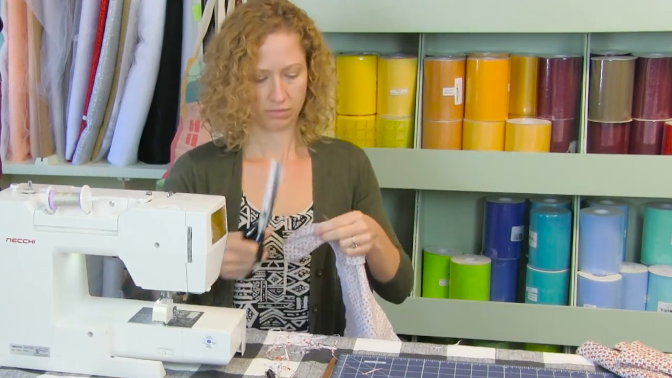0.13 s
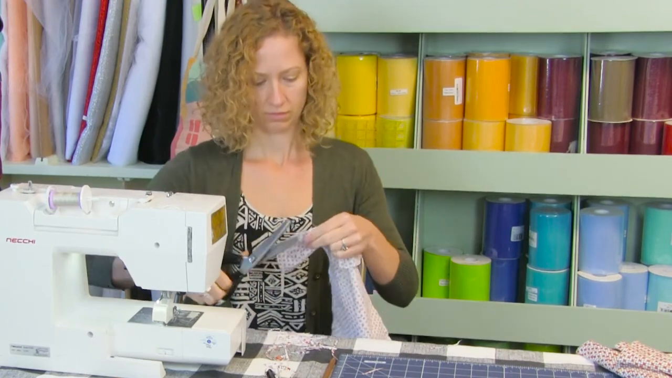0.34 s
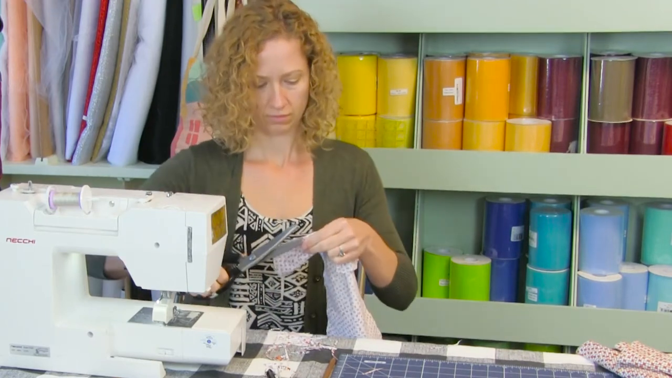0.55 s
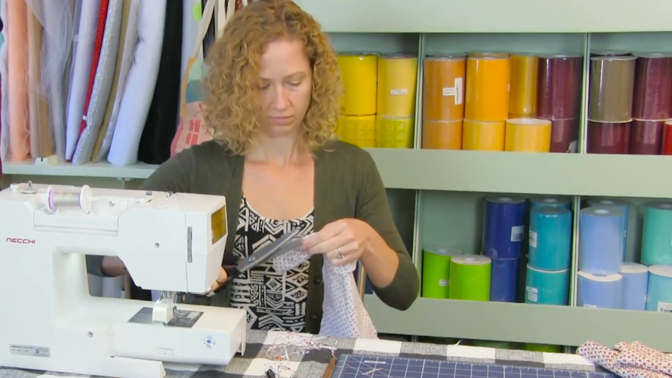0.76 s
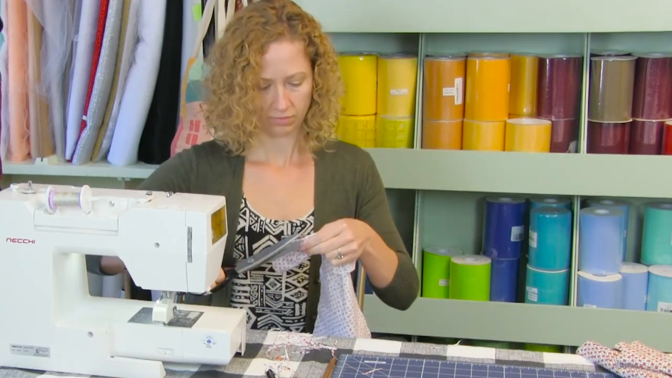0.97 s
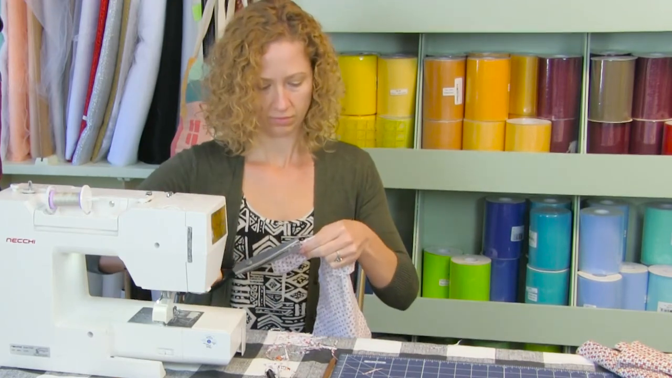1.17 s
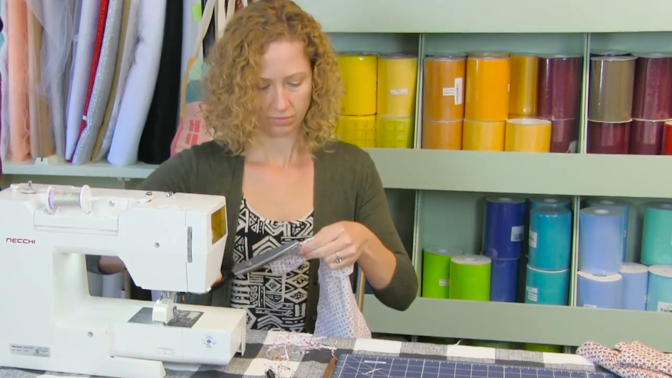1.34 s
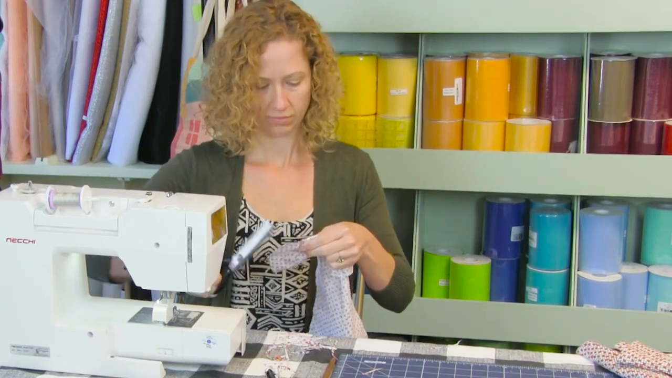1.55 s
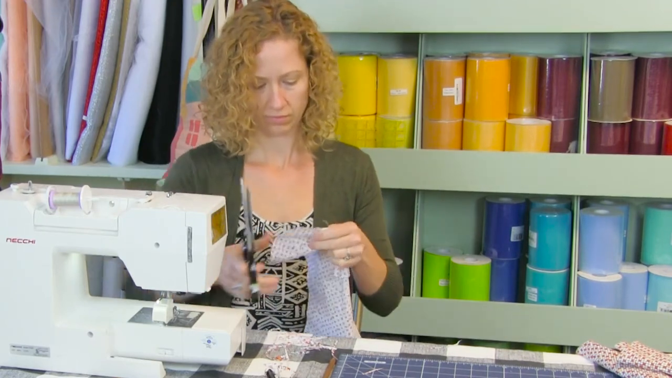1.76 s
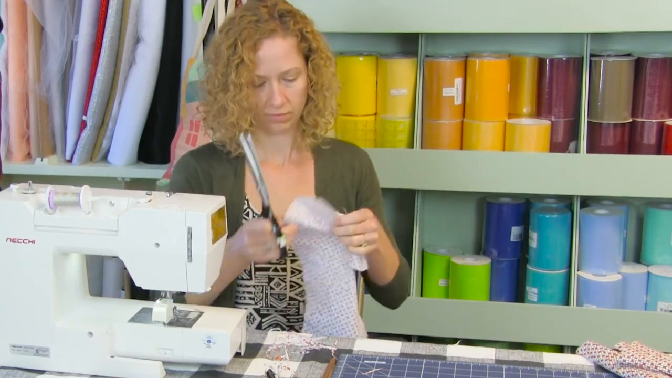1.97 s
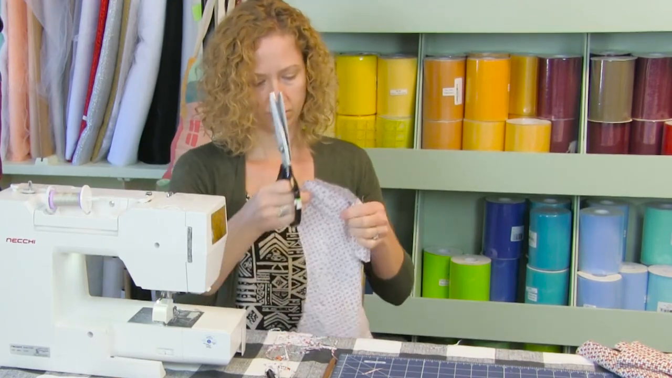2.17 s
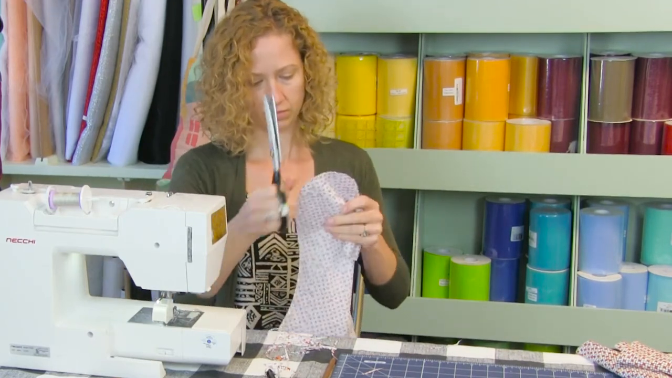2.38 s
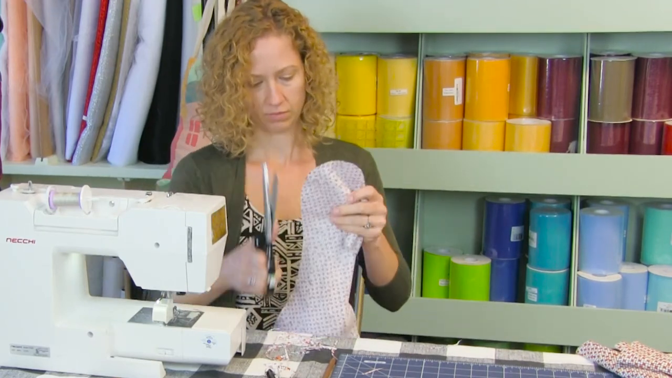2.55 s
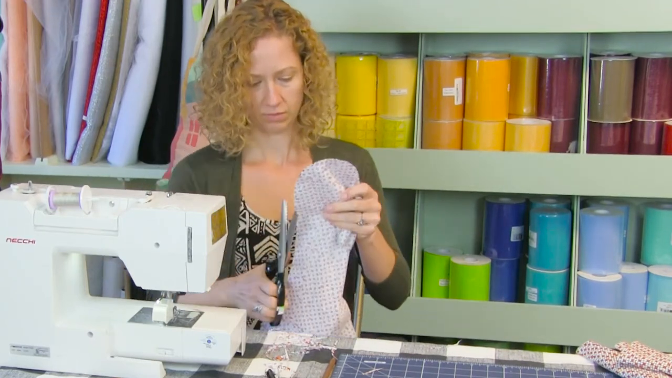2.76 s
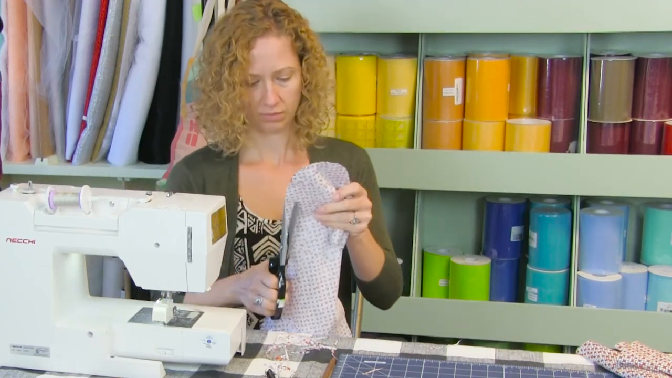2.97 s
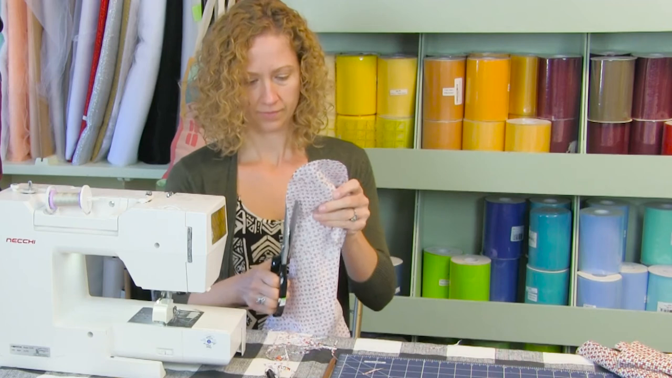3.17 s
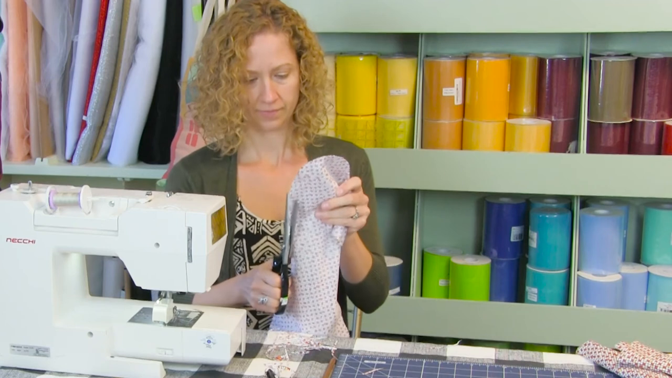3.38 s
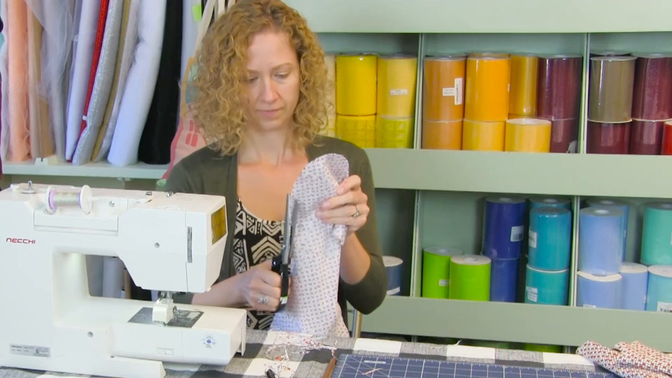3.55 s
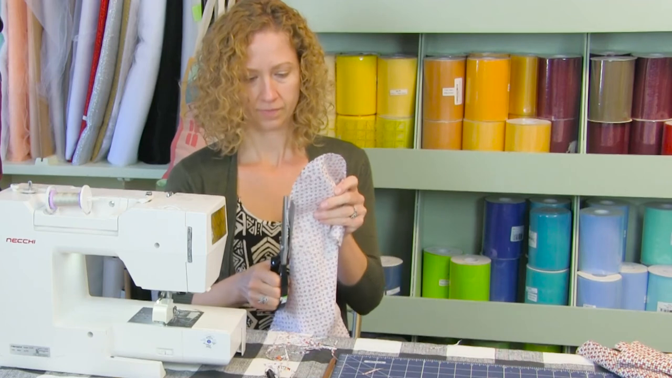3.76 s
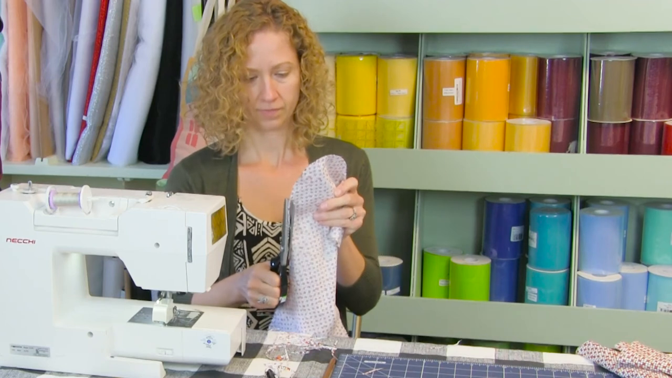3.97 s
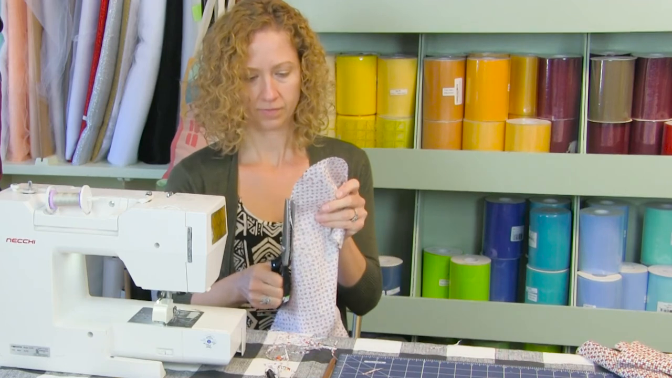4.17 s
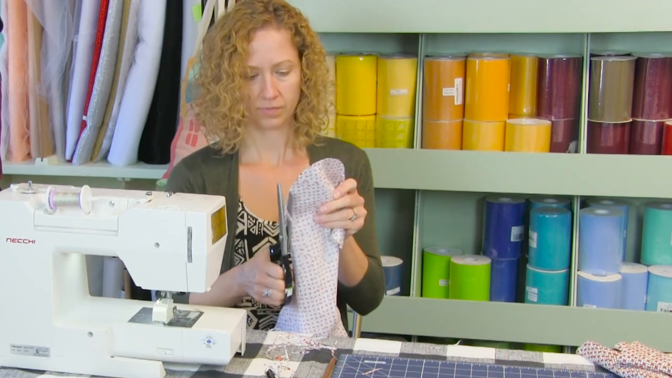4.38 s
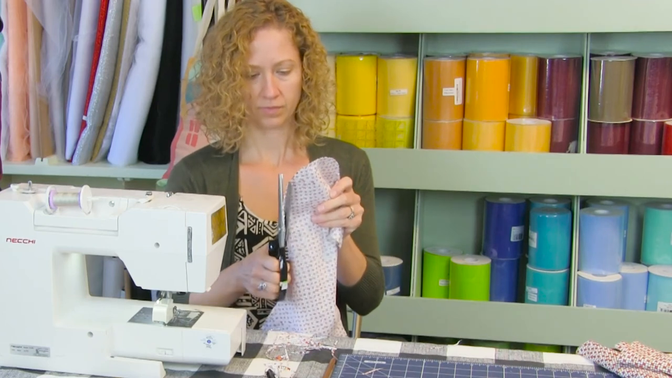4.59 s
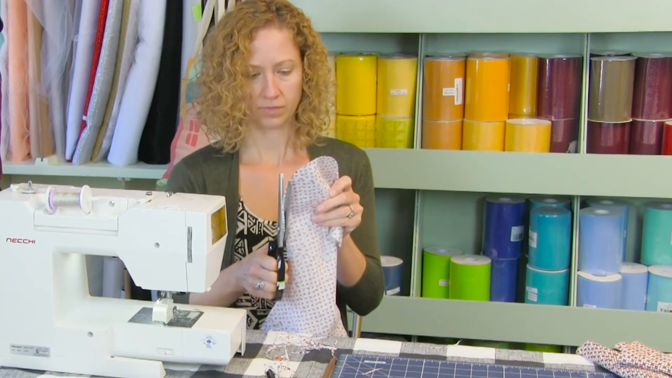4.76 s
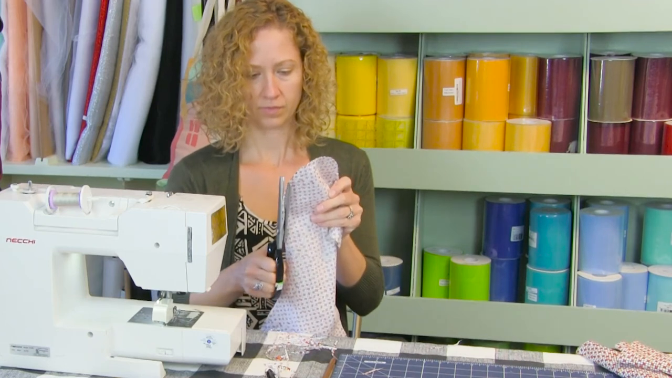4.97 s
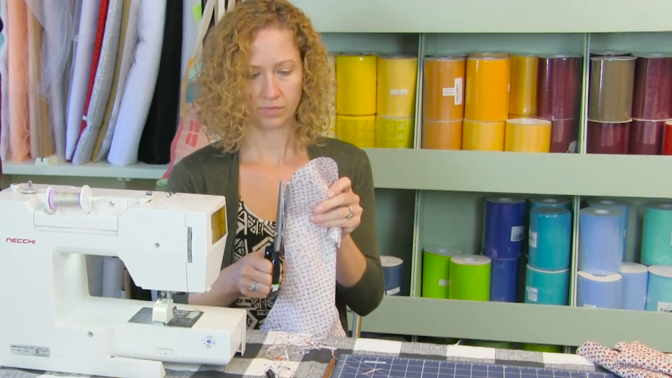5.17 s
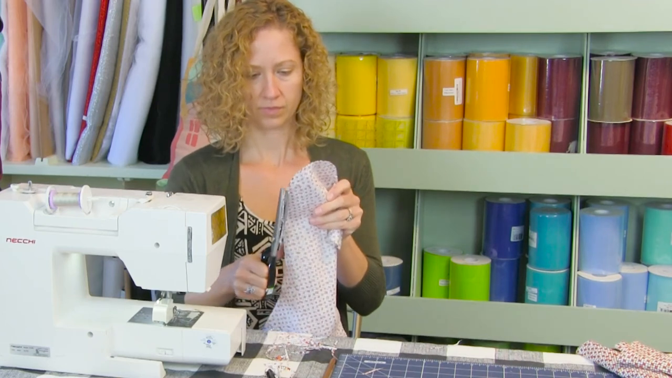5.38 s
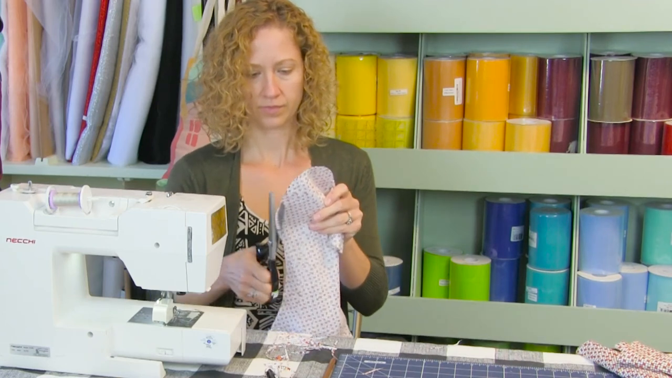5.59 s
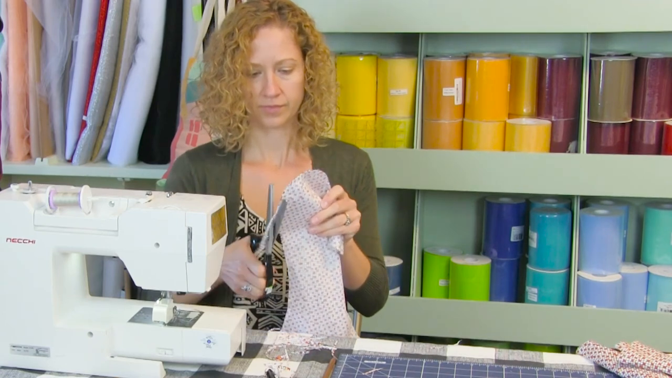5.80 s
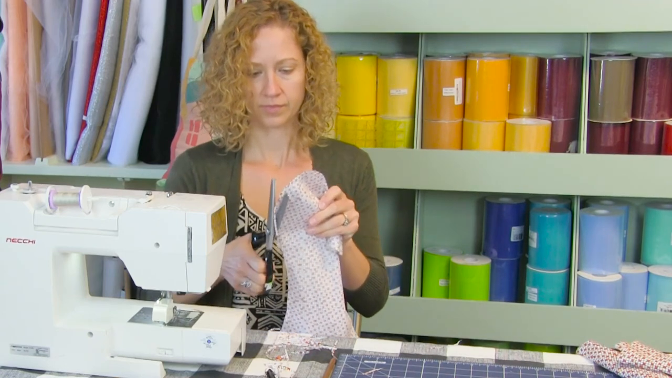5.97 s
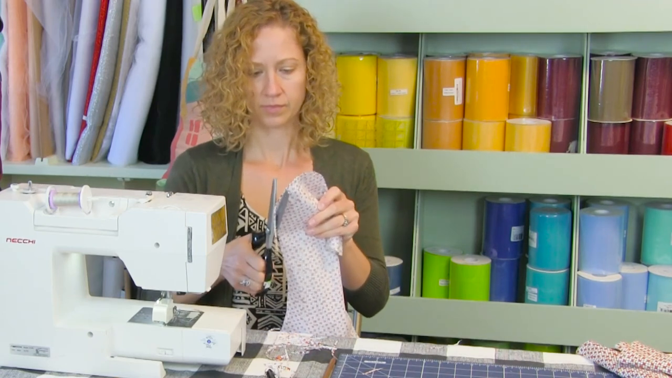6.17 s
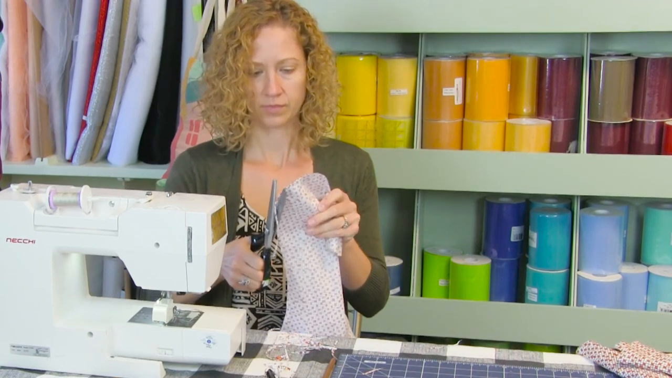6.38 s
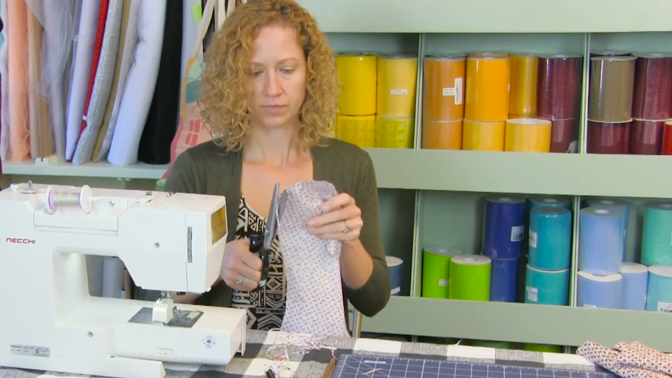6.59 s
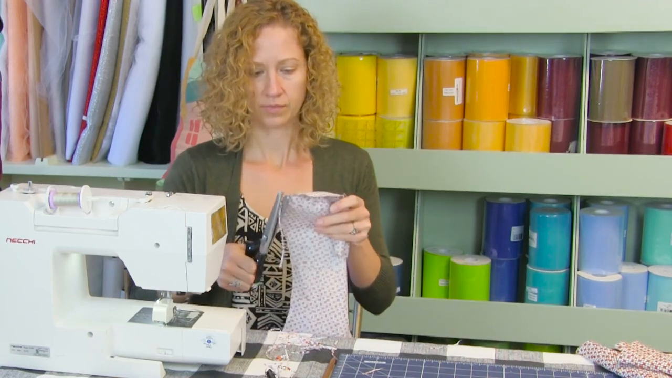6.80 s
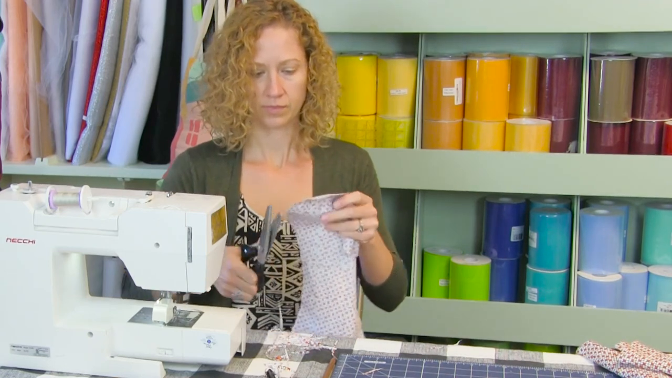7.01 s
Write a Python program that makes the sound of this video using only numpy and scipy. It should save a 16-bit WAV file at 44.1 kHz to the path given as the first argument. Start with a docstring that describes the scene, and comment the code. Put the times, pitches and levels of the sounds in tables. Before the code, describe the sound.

Close fabric cutting: a short snip snapping shut with a sharp metallic click, then three slower crunching cuts, light blade scrapes and cloth rustle between.

```python
"""At a sewing table in a small, dry room, shears make four slow snips into a cloth seam, heard in stereo.
Thread bundles and single threads part as bursts of grainy noise, coloured by where the blades cross.
The first snip ends in a slam, a chirped blow on blade modes; reopening blades scrape and tap as noise.
Flickering noise is cloth in the hand; tinted noise and hum lines rumble quietly underneath."""
import sys
import numpy as np
from scipy import signal
from scipy.fft import rfft, irfft
from scipy.io import wavfile

SR = 44100
rng = np.random.default_rng(int(sys.argv[2]) if len(sys.argv) > 2 else 0)


def store_pcm(level_fs):
    """Save levels as 16-bit WAV."""
    pcm = np.round(np.clip(level_fs, -1, 1) * 32767).astype(np.int16)
    wavfile.write(sys.argv[1], SR, np.atleast_2d(pcm).T)


N = 310464
SIZE = 4096  # samples per short sound
TIME_S = np.arange(N) / SR
AGE_S = np.arange(SIZE) / SR
BINS_HZ = np.fft.rfftfreq(SIZE, 1 / SR)

# strokes of the shears; the edges' crossing point travels from pivot (0) to tips (1):
# (start [s], end [s], travel at start [0-1], travel at end [0-1], relative single-thread level [dB],
#  body lift [dB], left minus right [dB])
SNIPS = [(0.938, 1.35, 0.69, 0.88, -67.5, -6.5, 1), (3.299, 4.15, 0, 0.85, -65, 4.5, 0),
         (4.85, 5.441, 0.018, 0.88, -60, 0, -1), (6.27, 6.93, 0.02, 0.79, -58.5, 0.5, -1)]


def undb(db):
    """Decibels to gain."""
    return 10 ** (np.asarray(db) / 20)


def unit(x):
    """Scale to rms 1."""
    return x / np.sqrt(np.mean(x ** 2))


def colour(points, hz=BINS_HZ):
    """Interpolate (Hz, dB) points on a log-frequency axis."""
    point_hz, point_db = np.transpose(points)
    return np.interp(np.log(hz + 1), np.log(point_hz), point_db)


def shelves(body_db, edge_db):
    """Lift the body below 4.5 kHz and the edge above 9 kHz, in dB."""
    return colour([(1500, body_db), (4500, 0), (9000, 0), (13500, edge_db)])


def bell(centre_hz, width_hz):
    """Shape of a resonance, 1 at its centre."""
    return 1 / (1 + (2 * (BINS_HZ - centre_hz) / width_hz) ** 2)


def resonate(push, db):
    """Ring a short push through a causal, minimum-phase filter of unit mean power."""
    cepstrum = irfft(np.log(unit(undb(db))))
    # fold onto positive time: minimum phase
    cepstrum[1:SIZE // 2] *= 2
    cepstrum[SIZE // 2 + 1:] = 0
    response = np.exp(rfft(cepstrum))
    return irfft(rfft(push) * response)


def noise(size, shared):
    """Two noises of rms 1 with a share of power in common."""
    common, *own = rng.standard_normal((3, size))
    return np.sqrt(shared) * common + np.sqrt(1 - shared) * np.array(own)


def tinted(points, size, shared):
    """Steady stereo noise of the given colour, rms 1."""
    gain = undb(colour(points, np.fft.rfftfreq(size, 1 / SR)))
    return unit(irfft(rfft(noise(size, shared)) * gain, size))


def grains(grit_db, shared):
    """Dense micro-fractures: noise whose strength jumps every 8 samples, rms 1."""
    strength = np.repeat(rng.exponential(size=SIZE // 8), 8).clip(0, 4)
    return unit(noise(SIZE, shared) * undb(grit_db * strength))


def pan(left_minus_right_db):
    """Left and right gains for a level difference."""
    return undb(np.array([[left_minus_right_db], [-left_minus_right_db]]) / 2)


def add(out, s, sound):
    """Mix a short sound in at time s."""
    i = max(int(s * SR), 0)
    out[:, i:i + SIZE] += sound[:, :max(N - i, 0)]


def background(air_db=-60.5, waver_rad=.8, hum_pan_db=-3):
    """Ventilation noise whose bottom slowly swells, with a smooth hiss and phase-wandering hum lines."""
    # spectrum of the air: (frequency [Hz], relative density [dB per Hz])
    air_colour = [(15, -13.5), (28, -9.5), (42, 0), (58, -7.5), (80, -3), (125, -13.5), (170, -25),
                  (230, -21), (320, -32), (500, -34), (700, -39), (1500, -43), (3500, -48.5),
                  (10500, -49.5), (15500, -70)]
    # channel balance of the air: (frequency [Hz], left minus right [dB])
    air_balance = [(30, -6), (80, -3.5), (160, -3.5), (350, 0), (700, 0.5), (15000, -0.5)]
    # swell of the rumble below about 60 Hz: (time [s], lift [dB])
    rumble_swell = [(0, 0), (.9, 5.5), (1.4, -2), (4.3, -2), (5.2, 3), (6.4, 2), (7.04, 8)]
    # hum lines: (frequency [Hz], rms level before panning [dB])
    hum_lines = [(41, -67), (79, -69), (120, -74.5), (237, -82), (297, -88), (360, -90)]

    hz = np.fft.rfftfreq(N, 1 / SR)
    side_db = np.outer([.5, -.5], colour(air_balance, hz))
    air = rfft(tinted(air_colour, N, shared=0.091)) * undb(air_db + side_db)
    low = irfft(air / (1 + (hz / 60) ** 4), N)
    swell = undb(np.interp(TIME_S, *np.transpose(rumble_swell)))
    out = irfft(air, N) + low * (swell - 1)

    knots_s = np.linspace(0, N / SR, num=36)
    for line_hz, db in hum_lines:
        steps = noise(len(knots_s), shared=.5)
        drift = np.array([np.interp(TIME_S, knots_s, np.cumsum(side)) for side in steps])
        tone = np.sin(2 * np.pi * line_hz * TIME_S + waver_rad * drift)
        out += np.sqrt(2) * undb(db) * pan(hum_pan_db) * tone
    return out


def room(direct, scattered, table_s=0.0031, table_db=-19, early_db=-7.5, early_t60_s=0.13,
         late_db=-21, late_t60_s=0.15, mic_lag_s=.002):
    """A table bounce, then a short tail soaked up by fabric; the right microphone is further off."""
    # colour of the tail: (frequency [Hz], relative level [dB])
    tail_colour = [(150, -3), (700, -1), (2200, 3), (5000, 0), (8000, -3.5), (10000, 3), (15500, -7.5)]

    age_s = np.arange(4 * SIZE) / SR
    onset = np.clip(age_s / table_s - .5, 0, 1)
    fade = 0
    for db, t60_s in ((early_db, early_t60_s), (late_db, late_t60_s)):
        fade = fade + undb(db) * unit(np.exp(-np.log(1000) * age_s / t60_s) * onset)
    response = tinted(tail_colour, len(age_s), shared=0) * fade / np.sqrt(len(age_s))
    tail = signal.fftconvolve(scattered, response, axes=1)[:, :N]
    bounce = undb(table_db) * np.roll(direct, int(table_s * SR), axis=1)
    left, right = direct + bounce + tail
    return np.array([left, np.roll(right, int(mic_lag_s * SR))])


def handling(flutter_db=3.5, held_db=-92):
    """Cloth slides through the fingers as flickering noise brushes, with soft bumps of the hands."""
    # cloth turned in the hand: (time [s], relative level [dB], Gaussian half length [s])
    brushes = [(0.106, -82, 0.031), (1.99, -82, 0.15), (2.447, -84, 0.11), (3.203, -93.5, 0.13)]
    # (frequency [Hz], relative level [dB])
    cloth_colour = [(200, -0.5), (1500, -0.5), (3500, -3.5), (7000, 0), (12000, -6.5), (15500, -13)]
    # hands on the cloth: (peak time [s], relative level [dB], length [s])
    bumps = [(1.933, -72.5, 0.023), (2.25, -69, .018), (2.362, -76, 0.018), (3.951, -68.5, .015)]
    # (frequency [Hz], relative level [dB])
    bump_colour = [(150, -6), (350, -2), (520, 0), (800, -9), (1300, -9), (3000, -19), (12000, -35)]

    knots_s = np.linspace(0, N / SR, num=280)
    flutter = np.interp(TIME_S, knots_s, rng.standard_normal(len(knots_s)))
    sliding = undb(held_db)
    for s, db, half_s in brushes:
        sliding = sliding + undb(db) * np.exp(-.5 * ((TIME_S - s) / half_s) ** 2)
    out = tinted(cloth_colour, N, shared=.3) * sliding * undb(flutter_db * flutter)

    for s, db, length_s in bumps:
        rise_s = length_s / 2
        swell = AGE_S / rise_s * np.exp(1 - AGE_S / rise_s)
        bump = resonate(noise(SIZE, shared=0.84) * swell, colour(bump_colour))
        add(out, s - rise_s, undb(db) * bump)
    return out


def ticking(decay_s=0.0024, pan_db=0.0):
    """Play in the pivot lets the blades tap each other: decaying noise through the steel's colour."""
    # light taps: (time [s], relative level [dB], body lift [dB], edge lift [dB])
    ticks = [(0.5058, -40, -12, 14), (1.8575, -47, -5, -10), (2.4465, -54, 1, 2), (2.468, -60.5, -1, -8),
             (2.497, -73, 6, -10), (2.54, -70, 5, -5.5), (3.9935, -58, 17, 2), (4.345, -58.5, 7, -12),
             (5.619, -55, -24, -6), (5.698, -57.5, 24, -16), (6.928, -45, 14, -20)]
    # (frequency [Hz], relative level [dB])
    tick_colour = [(150, -36), (700, -52), (2000, -19.5), (3100, -6.5), (4400, -8), (5800, -12.5),
                   (7400, -3.5), (8500, -5.5), (9600, -8.5), (10600, -14), (12800, -26), (15500, -36)]

    out = np.zeros((2, N))
    for s, db, body_db, edge_db in ticks:
        push = noise(SIZE, shared=0.07) * np.exp(-AGE_S / decay_s)
        tap = resonate(push, colour(tick_colour) + shelves(body_db, edge_db))
        add(out, s, undb(db) * pan(pan_db) * tap)
    return out


def scraping(slip_s=0.0015, fade_s=0.0022, pan_db=-1.0):
    """Edges drag as a hiss, broken into sharp slips by judder; a short last cut is made the same way."""
    # blades sliding open, and at 5.476 s a short last cut ending the third snip:
    # (time [s], length [s], relative level [dB], slip rate [Hz], judder share [0-1],
    #  lift of both body and edge [dB])
    scrapes = [(0.219, 0.063, -68, 170, 0, 5), (1.696, 0.034, -45.5, 100, 0.5, 6.5),
               (2.446, 0.068, -69, 45, 0.8, -11), (4.2676, 0.051, -53.5, 120, 0.67, -4.5),
               (5.476, 0.011, -46.5, 290, 0.25, -13.5), (5.615, 0.04, -46.5, 140, 0.59, -7),
               (5.653, 0.015, -52.5, 144, 0.45, 1)]
    # (frequency [Hz], relative level [dB])
    scrape_colour = [(150, -34), (700, -38), (1300, -9.5), (2200, -5.5), (3200, -2.5), (4800, -4),
                     (6000, 1), (7200, 5), (8100, -1.5), (9200, -7), (11000, -12.5), (13000, -15),
                     (15500, -29)]

    out = np.zeros((2, N))
    for s, length_s, db, slip_hz, judder, lift_db in scrapes:
        stroke = .5 + 0.64 * np.sin(np.pi * np.minimum(AGE_S / length_s, 1))
        stroke *= np.exp(-np.maximum(AGE_S - length_s, 0) / fade_s)
        since_slip_s = (AGE_S - .002) % (1 / slip_hz)
        slips = unit(np.exp(-since_slip_s / slip_s))
        roughness = np.sqrt(1 - judder + judder * slips ** 2)
        push = grains(grit_db=5.0, shared=0.58) * stroke * roughness
        scrape = resonate(push, colour(scrape_colour) + shelves(lift_db, lift_db))
        add(out, s, undb(db) * pan(pan_db) * scrape)
    return out


def slamming(travel_s=0.0018, knock_s=.004, scatter_body_db=4, scatter_edge_db=5):
    """Steel meets steel: the click aimed at the microphones, and the smoother sum sent all round."""
    # blades slam shut: (time [s], click [dB], scattered into the room [dB], knock [dB]), all relative
    slams = [(1.3579, 11.5, 7, -43.5)]
    # (frequency [Hz], relative level [dB])
    slam_colour = [(150, -31.5), (600, -29), (1300, -27.5), (2100, -18), (3000, -11.5), (3700, -7.5),
                   (5000, -1.5), (6500, -0.5), (8200, 1.5), (9000, -8.5), (12000, -15.5), (15500, -29)]
    # blade modes: (frequency [Hz], width [Hz], lift to the left [dB], lift to the right [dB])
    blade_modes = [(2020, 170, 6.5, 8.5), (3780, 590, 8, 10.5), (4707, 530, 1.5, -10), (6250, 359, 3.5, 3),
                   (6700, 330, 2, -2), (7700, 2300, -0.5, -3.5), (8000, 350, 8.5, 11.5), (9300, 450, -2, 4),
                   (11400, 500, 3, 1.5), (14100, 500, 0, 13)]

    direct, scattered = np.zeros((2, 2, N))
    # bending waves run faster in the treble: a tiny falling chirp, arriving after travel_s at 4 kHz
    blow = irfft(np.exp(-4j * np.pi * travel_s * np.sqrt(4000 * BINS_HZ)))
    modes_db = sum(np.outer([left_db, right_db], bell(hz, width_hz))
                   for hz, width_hz, left_db, right_db in blade_modes)
    slam_db = colour(slam_colour)
    click = np.array([resonate(blow, slam_db + side_db) for side_db in modes_db])
    spread = resonate(np.array([blow, blow]), slam_db + shelves(scatter_body_db, scatter_edge_db))
    knock_colour = [(80, -17.5), (300, -4.5), (900, -1.0), (2000, -8), (5000, -29.0)]  # (Hz, dB)
    for s, click_db, scatter_db, knock_db in slams:
        # the handles meet with a dull knock
        push = noise(SIZE, shared=.7) * np.exp(-AGE_S / knock_s)
        knock = undb(knock_db) * resonate(push, colour(knock_colour))
        add(direct, s, undb(click_db) * click + knock)
        add(scattered, s, undb(scatter_db) * spread + knock)
    return direct, scattered


def jaw_colour(closure, bend=2.5, damping=0.88, wander=0.028):
    """Colour of a cut in dB: blade resonances and dips slide from jaws wide to jaws nearly closed."""
    # jaws wide: (frequency [Hz], relative level [dB])
    jaws_wide = [(150, -25.5), (600, -28.5), (1500, -26.5), (2150, -24.5), (2600, -21.5), (3300, -16.5),
                 (4500, -15), (5200, -4), (7200, -2.5), (8500, -8.5), (9800, -16.5), (11200, -10),
                 (12800, -26), (15500, -32.5)]
    # jaws nearly closed: (frequency [Hz], relative level [dB])
    jaws_narrow = [(150, -24.5), (600, -21), (1300, -29.5), (2200, -12.5), (2900, -21.5), (3600, -12),
                   (5000, -11.5), (6000, -5.5), (7000, -5), (8300, -7.5), (9300, -4.5), (10300, -25),
                   (12500, -28), (15500, -33.5)]
    # sliding modes, undamped: (wide [Hz], narrow [Hz], width [Hz], lift or dip [dB])
    jaw_modes = [(2580, 2180, 160, 10), (3700, 2850, 600, -5), (4550, 5400, 450, -5), (5100, 6200, 350, 5),
                 (7200, 7000, 220, 6), (9000, 8100, 350, 3), (11200, 9400, 700, 4), (13000, 10400, 900, -6)]

    db = (1 - closure) * colour(jaws_wide) + closure * colour(jaws_narrow)
    # closing, the cloth damps the blades and each bite sits a little differently
    broadening = 1 + damping * closure ** 2
    detune = 1 + wander * closure ** 2 * rng.standard_normal()
    for wide_hz, narrow_hz, width_hz, peak_db in jaw_modes:
        centre_hz = detune * (wide_hz + closure ** bend * (narrow_hz - wide_hz))
        db = db + peak_db / np.sqrt(broadening) * bell(centre_hz, width_hz * broadening)
    return db


def along_blades(s, snip):
    """The edges cross at a steady speed; gives closure, body, edge and thread dB at time s."""
    # sound along the blades, brightest midway:
    # (travel [0-1], jaw closure [0-1], body lift [dB], edge lift [dB], single-thread lift [dB])
    blade_run = [(0, 0.15, -10, -32, -0.5), (.09, 0.25, -9.5, -23, -2.5), (.2, 0, -0.5, -5, 2),
                 (.33, 0.13, -1.5, 9.5, -5.5), (.47, .2, 13, 22, -11), (.57, .7, 5, 27.5, -6),
                 (.65, 1, 7, 17, -3), (.78, .6, 2.5, -1.5, -6), (.87, 0.8, -13.5, 0.5, -8),
                 (1, 1, -24, 2, 2)]

    start_s, end_s, first, last = snip[:4]
    travel, *columns = np.transpose(blade_run)
    crossing = np.interp(s, [start_s, end_s], [first, last])
    return [np.interp(crossing, travel, column) for column in columns]


def crunch(s, length_s, snip, rise=0.44, fall=0.55, drag_db=-17, drag_s=.012, vary_db=0.5):
    """A grainy swell of straining cloth, peaking two lengths in; the edges then drag on."""
    closure, body_db, edge_db, _ = along_blades(s, snip)
    snip_body_db, pan_db = snip[5:]
    t = AGE_S - 2 * length_s
    swell = np.exp(-.5 * (t / (length_s * np.where(t < 0, rise, fall))) ** 2)
    drag = undb(drag_db) * np.exp(-np.abs(t) / drag_s) * (t > 0)
    push = grains(grit_db=4.5, shared=.25) * np.maximum(swell, drag)
    varied_edge_db = edge_db + vary_db * rng.standard_normal()
    tint_db = jaw_colour(closure) + shelves(body_db + snip_body_db, varied_edge_db)
    return pan(pan_db) * resonate(push, tint_db)


def fraying(threads_per_s=80, thread_s=.004, scatter_db=2.5):
    """Single threads snap all through each stroke, one at a random moment in each equal slot."""
    out = np.zeros((2, N))
    for snip in SNIPS:
        start_s, end_s, _, _, db = snip[:5]
        count = int(round(end_s - start_s, 1) * threads_per_s)
        slots = (np.arange(count) + rng.random(count)) / count
        for s in start_s + (end_s - start_s) * slots:
            thread_db = along_blades(s, snip)[-1]
            strength_db = db + thread_db + scatter_db * rng.standard_normal()
            add(out, s - 2 * thread_s, undb(strength_db) * crunch(s, thread_s, snip))
    return out


def cutting(trim_db=-2.0):
    """Thread bundles part, and cloth once brushes into the jaws, coloured by where the blades cross."""
    # bundles parting, and at 3.133 s cloth brushing faintly into the open jaws:
    # (peak time [s], level before trim [dB], length [s])
    crunches = [(0.937, -54, 0.0079), (0.956, -50.5, 0.0057), (0.991, -49, 0.0063), (1.002, -49, .005),
                (1.034, -52, 0.0083), (1.137, -49.5, 0.018), (1.256, -45, .006), (1.2939, -44, 0.0077),
                (1.31, -38, 0.0056), (1.353, -35, 0.0028), (3.133, -68.5, 0.029), (3.321, -56.5, .02),
                (3.355, -56, 0.0064), (3.371, -56, .009), (3.448, -61.5, 0.024), (3.472, -57.5, .012),
                (3.534, -57.5, 0.024), (3.592, -57, 0.01), (3.637, -53, 0.007), (3.661, -57, 0.0063),
                (3.769, -55, 0.0085), (3.874, -54.5, 0.02), (3.947, -56.5, .013), (4.004, -49.5, 0.015),
                (4.041, -47.5, 0.0071), (4.066, -44, 0.0083), (4.113, -40.5, .007), (4.869, -53.5, 0.022),
                (4.93, -55, .012), (4.956, -48.5, .008), (4.974, -51.5, 0.0072), (5.007, -55.5, 0.023),
                (5.076, -50, 0.01), (5.112, -55, .005), (5.135, -56, 0.0086), (5.179, -55.5, 0.013),
                (5.204, -58, 0.0096), (5.23, -53, .012), (5.271, -57.5, 0.014), (5.345, -56.5, 0.02),
                (5.397, -49.5, 0.011), (6.312, -50.5, 0.012), (6.332, -51.5, 0.022), (6.383, -52, 0.023),
                (6.419, -57, 0.0054), (6.464, -58, .012), (6.568, -54, .01), (6.594, -54, 0.014),
                (6.695, -56, 0.019), (6.741, -56.5, 0.011), (6.777, -52.5, 0.01), (6.832, -52, 0.016),
                (6.881, -50.5, 0.008), (6.904, -46.5, 0.012)]

    out = np.zeros((2, N))
    for s, db, length_s in crunches:
        snip = min(SNIPS, key=lambda row: abs((row[0] + row[1]) / 2 - s))  # nearest stroke
        add(out, s - 2 * length_s, undb(db + trim_db) * crunch(s, length_s, snip))
    return out


def scene():
    """Shears and cloth in the room, over its background."""
    work = handling() + ticking() + scraping() + fraying() + cutting()
    click, scattered = slamming()
    return background() + room(work + click, work + scattered)


def record(dry, top_hz=15800):
    """The recorder clips at full scale and cuts the top with a steep low-pass."""
    low_pass = signal.ellip(10, .2, 90, top_hz, fs=SR, output="sos")
    return signal.sosfilt(low_pass, np.clip(dry, -1, 1))


dry = scene()
out = record(dry)
store_pcm(out)
```